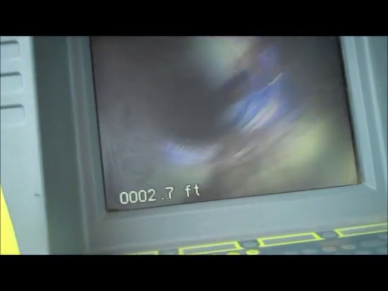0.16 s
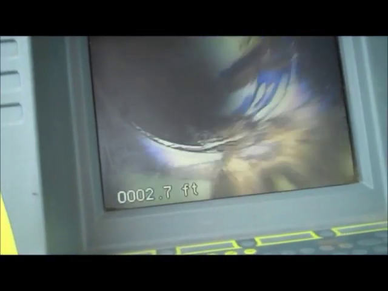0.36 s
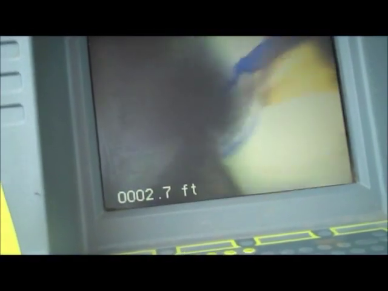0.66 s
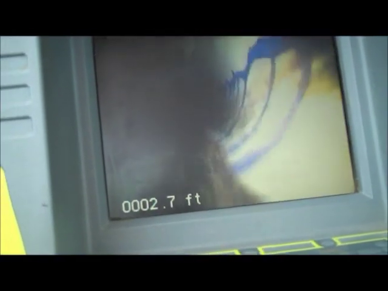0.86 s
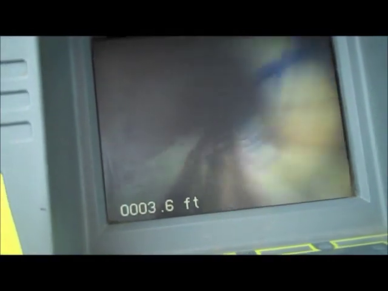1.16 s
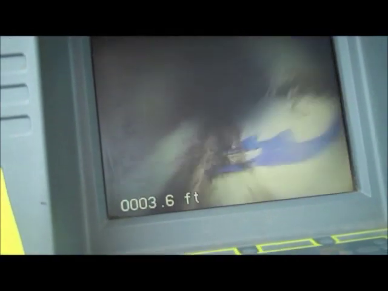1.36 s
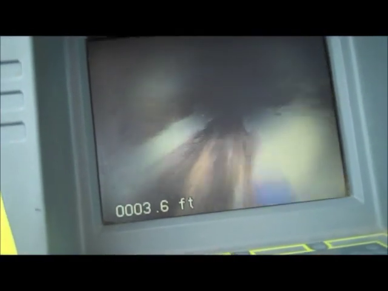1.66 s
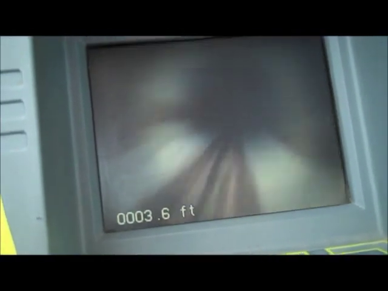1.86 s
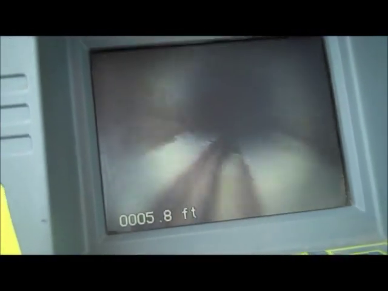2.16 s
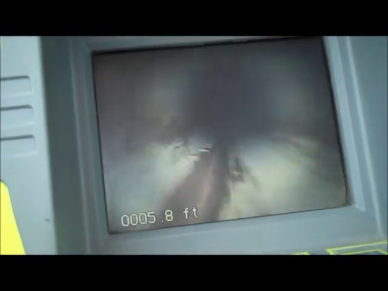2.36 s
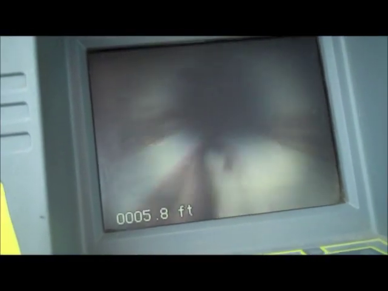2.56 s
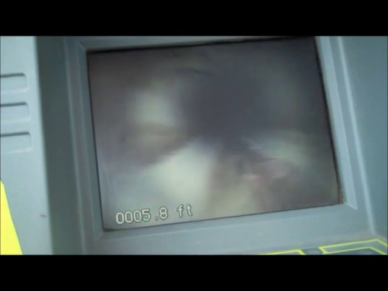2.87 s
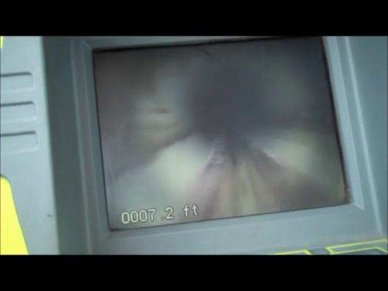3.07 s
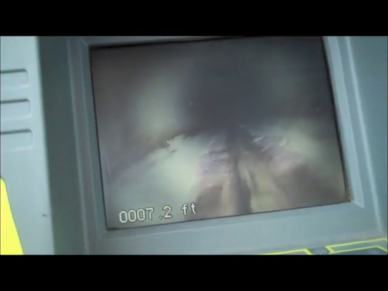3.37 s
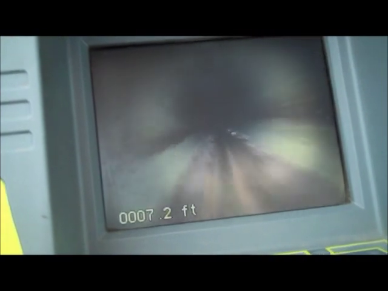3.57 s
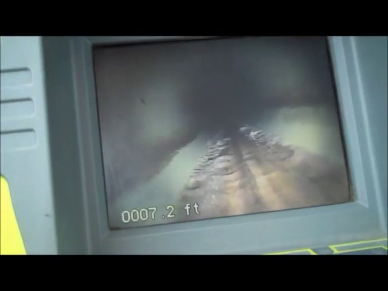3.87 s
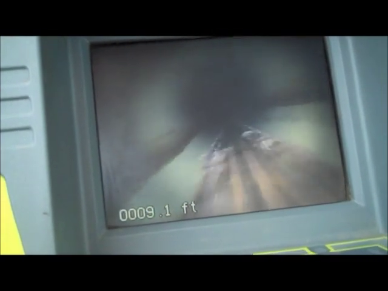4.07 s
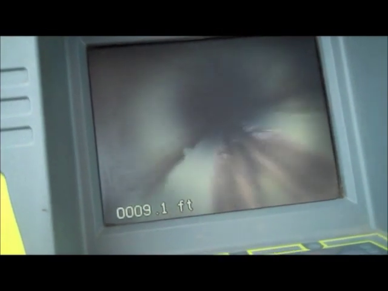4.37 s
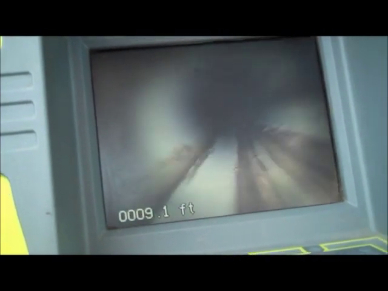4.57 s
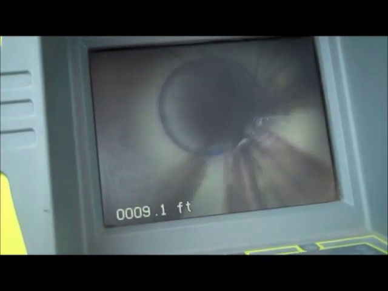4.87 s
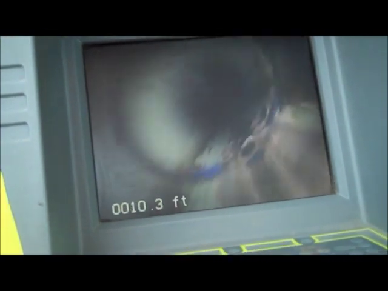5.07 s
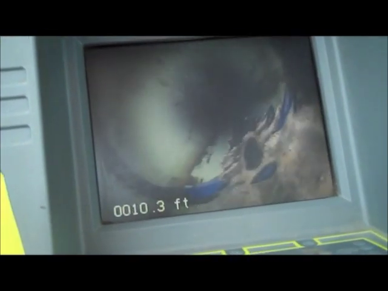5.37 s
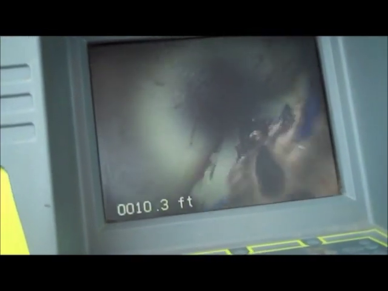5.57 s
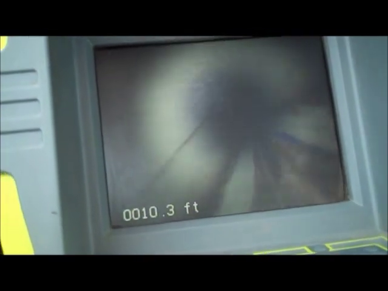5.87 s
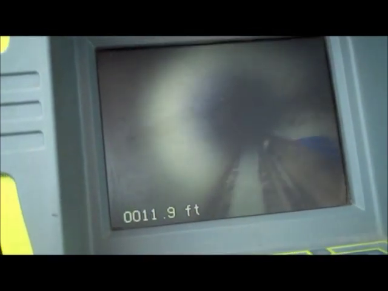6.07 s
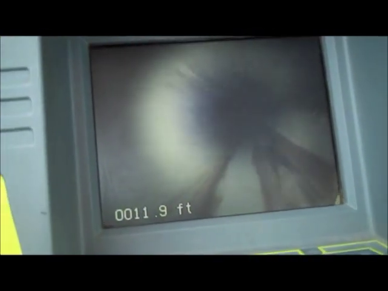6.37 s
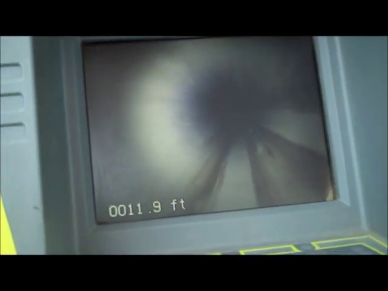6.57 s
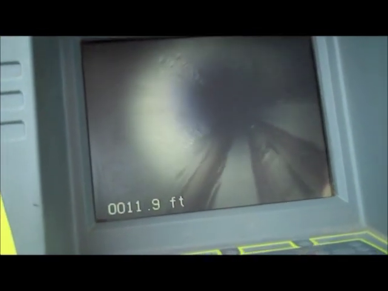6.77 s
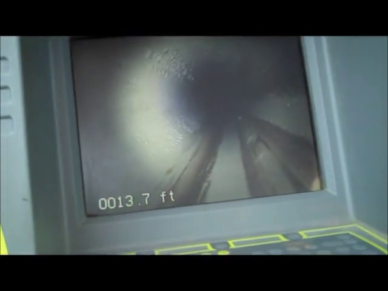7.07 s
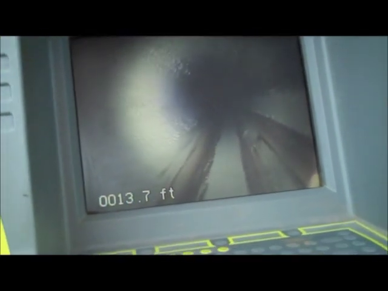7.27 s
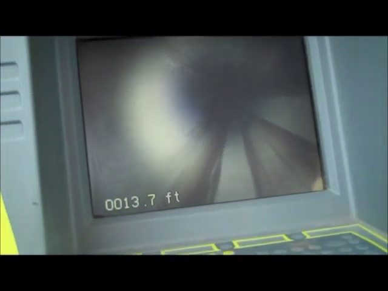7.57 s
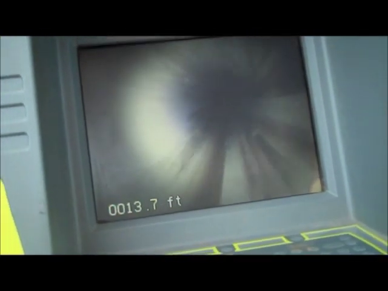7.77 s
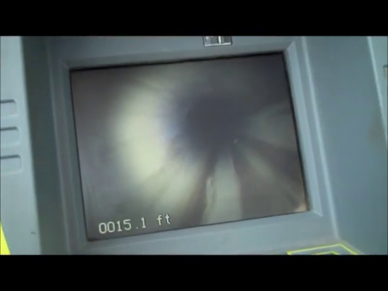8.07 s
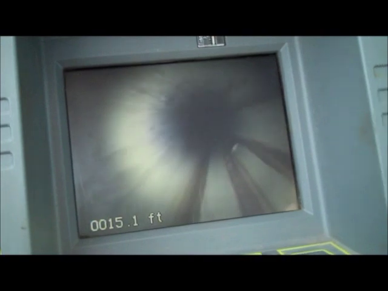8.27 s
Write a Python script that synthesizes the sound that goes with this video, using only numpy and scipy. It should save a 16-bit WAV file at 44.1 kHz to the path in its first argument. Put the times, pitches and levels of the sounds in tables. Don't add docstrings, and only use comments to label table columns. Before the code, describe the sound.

Outdoors by a wall, close bright stereo microphones, soft traffic rumble and hiss. At 0 s a dry snap and scuff, a slap at 0.15, then at 0.47 a huge overloading crack with a low bump on the left. Light gritty rubbing strokes and ticks follow to 2 s, with tiny squeaks around 1.4 and 1.7 and faint bird calls from 0.6 to 1.8. Knocks at 2.1 and 2.5; a rapid cluster of snaps with a hollow thud at 2.8-3.0. Short rasps, then a sharp slap at 4.0, distant birds to 4.5, a hard double slap at 4.7, another slap at 5.55. The busiest scraping and cracking is 6.2-6.5, with a pipe thud, then a dull knock and squeak at 6.8, a slap at 7.2, and sparse faint clicks and scuffs until 8.4. Throughout, the steel reel sings in thin wavering high tones, swelling with each pull.

```python
import sys
import numpy as np
from scipy import signal
from scipy.io import wavfile
from scipy.ndimage import uniform_filter1d

SR = 44100
rng = np.random.default_rng(int(sys.argv[2]) if len(sys.argv) > 2 else 0)


def output_pcm(signal):
    pcm = np.clip(np.atleast_2d(signal).T, -1, 1) * 32767
    wavfile.write(sys.argv[1], SR, np.round(pcm).astype(np.int16))


def invert_db(x):
    u = np.asarray(x, float) / 20
    return 10 ** u


N = 370881

# (frequency [Hz], density [dB per Hz])
OUTDOORS = [(30, -3), (150, -2), (300, -3.5), (480, -11), (1200, -7.5), (4000, -15.5), (8000, -25.5),
            (15000, -20.5)]
OUTDOORS_DB = -48.5
# (frequency [Hz], left-right likeness [0-1])
LIKENESS = [(60, 0.08), (180, 0.97), (540, 0.71), (1620, 0.53), (4870, 0.019), (14600, 0.048)]
# (frequency [Hz], width [Hz], level [dB])
HUM_LINES = [(67, 10.4, 2.5), (155.2, 6.4, -1), (232, 10, -6.5), (433.5, 37, -2.5)]
# (time [s], level [dB])
TRAFFIC = [(0, -56.5), (.5, -64), (1.8, -64), (2.2, -58), (3, -62.5), (5, -63), (6.4, -57), (7.8, -58),
           (8.41, -61)]

# (start [s], length [s], high frame [dB], middle frame [dB], low frame [dB])
SPINS = [(0, 0.17, -62, -55, -50.5), (.2, .26, -71, -61, -49.5), (.8, 0.33, -74, -70, -54),
         (1.462, 0.29, -60, -61, -52.5), (1.997, 0.26, -55, -62, -51.5), (2.306, 0.25, -55.5, -58, -56),
         (2.985, 0.36, -55.5, -58, -51.5), (3.427, 0.23, -54, -58, -46), (3.847, 0.24, -66, -60, -49.5),
         (4.45, .16, -58, -61, -55), (4.676, 0.1, -62, -65, -75), (4.914, .5, -60, -63, -58),
         (5.55, 0.56, -55, -66, -54), (6.0, 0.2, -65, -66, -58), (6.238, 0.11, -62, -64, -42.5),
         (6.45, 0.34, -73, -70, -56), (6.773, 0.29, -60, -65, -50), (7.25, 0.43, -65, -63, -57),
         (7.89, 0.24, -58, -63, -49.5), (8.243, 0.088, -56, -64, -55)]
SPIN_ATTACK_S, SPIN_SAG_DB_PER_S, SPIN_RELEASE_S = 0.02, -10, 0.05
# (frequency [Hz], width [Hz], level [dB])
HIGH_FRAME = [(7178, 26, -7), (7945, 30, -14)]
MID_FRAME = [(3970, 27, -8), (5150, 24, -13), (5820, 26, -14.5)]
LOW_FRAME = [(1916, 85, -5), (2347, 90, -15), (1588, 80, -13)]
IDLE_DB = -66.5
# (time [s], level [dB])
AXLE = [(0, -63), (2.5, -78), (2.9, -53), (3.3, -104), (5.5, -63), (5.8, -61), (6.2, -78), (7.6, -70),
        (7.9, -62), (8.41, -64)]
AXLE_HZ, AXLE_WIDTH_HZ = 3070, 22.0

# (time [s], crack peak [dB], pipe ring [dB], left-right [dB], extra sharpness [dB])
SLAPS = [(0.1436, -24.5, -32.5, 2, 0), (3.9886, -11, -28, 3, 0), (4.6992, -10, -21, 2.5, 7),
         (4.7018, -9.5, -22.5, -3, -11), (5.1305, -38, -35.5, -1, 0), (5.5474, -17, -24, -0.5, 0),
         (6.236, -20, -30.5, -5.5, 1), (6.434, -10, -34, 7.5, 2), (6.4365, -10.5, -27, 2, -4),
         (7.1693, -22, -29.5, -1, 0), (7.288, -37, -43, 2, 0)]
SNAPS = [(.0004, -20.5, -25.5, -1, 5), (0.4676, 10, -10, -3.5, 1), (1.094, -34.5, -49, 6, 5),
         (1.4082, -26, -43, 11.5, 2), (1.4244, -29, -60, 4, 4), (1.515, -22.5, -44, 10, 1.5),
         (2.7958, -17.5, -36, 3, -4), (2.8073, -9, -28.5, 0.5, -0.5), (2.888, -14, -32, -1, -2),
         (2.895, -20.5, -52, 14, 1), (2.9027, -14.5, -44, -9, -4), (2.9183, -13, -38, 0, -2),
         (2.942, -16.5, -36, 0, -1), (2.9628, -15.5, -29, -2, -2), (4.6116, -33.5, -49, 9, 6),
         (4.6544, -36, -36.5, 0, 0), (6.3934, -12, -37, 4, -0.5), (6.7316, -37, -57, 5, 3),
         (7.3597, -40, -55, 5, 3), (7.444, -28.5, -52, 7, -1), (8.166, -34.5, -44, 4, 6)]
SCUFFS = [(.012, -34, -33.5, 2, 0), (.459, -8, -22.5, 6, 0), (.766, -30, -43, 0, 0),
          (.972, -31, -42, -3, 0), (2.012, -29, -52, -1, 0), (2.158, -21, -33, 0.5, 0),
          (2.305, -34, -52, 3, 0), (2.436, -30, -39, 3, 0), (3.49, -29, -43, 3, 0),
          (4.912, -34.5, -49, 14, 0), (6.328, -16, -32.5, 1, 0), (6.357, -28, -43, -3, 0),
          (6.473, -13, -23.5, -0.5, 0), (8.266, -34, -48, 11, 0), (8.325, -38, -52, 6, 0)]
TAPS = [(1.3294, -37, -45, 3, 0), (3.1506, -36, -49, 2.5, 0), (3.966, -29, -33, 2.5, 3),
        (4.5344, -36, -30, 3, 0), (4.676, -20, -35, 2.5, 0)]
KNOCKS = [(1.596, -48, -34.5, 1.4, 0), (2.13, -25.5, -30, 0, 0), (2.4785, -32, -29, .5, 0),
          (2.531, -35, -27.5, 1, 0), (6.802, -36, -32, 2, 0)]
# (blows [table], attack [s], rattle t60 [s], sharp edge re crack [dB])
KINDS = [
    (SLAPS, 0.0018, 0.03, -26.5),
    (SNAPS, 0.0019, 0.031, -18),
    (SCUFFS, 0.007, 0.074, -18.5),
    (TAPS, 0.0015, 0.01, -20),
    (KNOCKS, 0.0029, 0.042, -16),
]
FIRST_CONTACT = 5
ROD_SPREAD = .8
# (frequency [Hz], level [dB], t60 [s])
PIPE_WALL = [(1506, 6, 0.059), (1750, 14, 0.0096), (2010, -14.5, 0.0095), (2170, 8, 0.0038),
             (2600, 7, 0.037), (2600, 11, 0.0096), (3010, -3, 0.043), (3420, 3, 0.0059)]

# (time [s], pitch [Hz], level [dB])
TICKS = [(.012, 2900, -31), (.016, 1750, -32), (.416, 1450, -34), (.436, 1400, -35), (1.166, 2550, -36),
         (1.19, 2050, -32.5), (1.207, 2500, -38), (1.229, 2500, -36), (1.252, 2700, -41),
         (1.268, 3350, -38), (1.29, 2370, -31.5), (1.308, 1300, -38), (1.322, 3500, -42),
         (1.334, 1540, -34), (1.362, 2200, -39), (1.403, 3350, -39.5), (1.493, 1880, -37),
         (1.598, 1750, -28.5), (1.597, 2600, -33), (1.684, 3310, -38), (1.955, 3310, -41),
         (2.131, 1760, -28.5), (2.136, 2700, -32), (2.161, 2100, -34), (2.22, 2900, -38),
         (2.311, 2450, -37), (2.432, 2350, -34), (2.48, 1800, -31), (2.918, 2400, -33), (2.963, 1820, -31),
         (6.33, 2300, -35), (6.479, 1710, -33), (2.532, 2340, -22.5), (3.517, 1950, -37),
         (3.951, 1430, -34), (3.99, 2470, -26), (3.99, 3300, -35), (4.376, 1900, -37), (4.534, 2720, -40),
         (4.655, 2600, -33), (4.701, 3270, -18), (5.205, 1930, -39), (5.69, 1400, -39), (5.71, 2400, -39),
         (5.78, 2700, -41), (5.93, 2500, -38), (6.05, 2600, -37), (6.263, 1920, -35), (6.306, 1850, -30),
         (6.394, 3740, -32), (6.437, 2710, -27), (6.437, 3270, -31), (6.777, 1980, -37), (6.803, 2520, -25),
         (6.806, 1890, -28), (6.98, 1870, -40), (7.171, 2390, -33), (7.385, 1450, -37), (8.289, 1920, -39)]

# (start [s], length [s], bright rub [dB], pipe body [dB])
STROKES = [(.13, 0.092, -45.5, -52), (.36, 0.17, -48, -44.5), (.74, 0.39, -46.5, -51),
           (1.14, .22, -48.5, -46), (1.4, 0.47, -45.5, -48.5), (1.86, 0.13, -43.5, -46.5),
           (2.0, 0.21, -46.5, -50), (2.13, 0.22, -36, -41.5), (2.42, 0.12, -41, -42.5),
           (2.62, 0.5, -51, -52), (2.865, 0.16, -35.5, -38), (3.13, 0.084, -40.5, -44),
           (3.29, 0.068, -43, -48), (3.47, 0.066, -35.5, -41.5), (3.57, 0.13, -46.5, -46),
           (3.77, 0.25, -39.5, -48), (4.0, 0.23, -45.5, -48), (4.25, 0.34, -47, -51),
           (4.6, 0.14, -41, -43.5), (4.91, 0.57, -46, -49), (5.33, 0.11, -42.5, -53),
           (5.57, 0.28, -43.5, -45), (5.88, 0.48, -54.5, -47), (6.2, 0.1, -40.5, -41.5),
           (6.3, 0.19, -32, -37.5), (6.52, 0.37, -46.5, -46.5), (6.82, 0.23, -40.5, -46.5),
           (7.15, 0.31, -49.5, -48.5), (7.9, 0.13, -50, -48.5), (8.25, 0.084, -48, -51.5)]
STROKE_ATTACK_S, STROKE_SAG_DB_PER_S, STROKE_RELEASE_S = 0.022, 5, 0.038

# (time [s], peak [dB])
THUDS = [(0.143, -45), (2.129, -44), (2.532, -42.5), (2.804, -42), (2.941, -47), (2.961, -30), (3.491, -45),
         (4.534, -44), (4.7, -36.5), (5.548, -44), (6.311, -42), (6.433, -44), (6.479, -29.5), (6.801, -42),
         (7.17, -41.5)]
BOUNCE_S, BOUNCE_DB = 0.00553, 1
# (frequency [Hz], level [dB], t60 [s])
PIPE_AIR = [(135, 1, 0.033), (256, 2, 0.024), (385, 8, 0.04), (509, 5, 0.053), (870, -4, 0.04),
            (1244, 2, .025)]

# (time [s], level [dB], left-right [dB])
LOW_BUMP = (.468, -22, 18.5)

# (time [s], length [s], final pitch [Hz], level [dB], left-right [dB])
WHIT = [(.645, .095, 4900, -53.5, 4), (.855, .09, 4960, -54, 2), (1.062, .09, 5080, -54.5, 7),
        (3.87, .08, 5070, -57, 5), (4.078, .085, 5000, -56.5, 3), (4.285, .095, 5260, -56, -1)]
PIP = [(.785, 0.02, 4360, -54, 7), (.99, 0.03, 4360, -51, 10)]
TSEE = [(1.208, 0.11, 6180, -44.5, 0), (4.425, 0.11, 6140, -48, 0)]
TSIP = [(1.512, .08, 5880, -47.5, 0), (1.787, .058, 5870, -46, 0)]
LIFT = [(4.21, .06, 4700, -53, 2)]
SQUEAKS = [(1.385, 0.027, 1082, -45.5, 1), (1.676, .028, 1325, -48, 1), (1.712, .04, 1240, -49, 1),
           (3.155, .022, 1030, -45, 1), (6.8, 0.045, 944, -47, 1)]
# (share of note [0-1], pitch over final pitch [ratio], level [dB])
RISING = [(0, .62, -7), (.2, .67, 1), (.3, .7, -5), (.4, .79, -15), (.52, .9, 0), (.66, .94, -3),
          (1, 1.001, -10)]
LEVEL = [(0, .97, -3), (.3, .995, 0), (1, 1.001, -3)]
FALLING = [(0, 1.2, -5), (.12, 1.1, -3), (.27, 1.01, 0), (.45, .985, -2), (.7, 1.01, -1), (1, 1.02, -9)]
DROPPING = [(0, 1.17, -7), (.2, 1.08, -4), (.45, 1.005, 0), (1, .995, -7)]
LIFTING = [(0, .84, -1), (.4, .87, -2), (.7, .93, -8), (1, 1.001, -2)]
SAGGING = [(0, 1.14, -4), (.5, 1.08, 0), (1, 1.001, -3)]

YARD_T60_S, YARD_DB = 0.12, -7
TREES_T60_S, TREES_DB = .2, -3.5
# (resonance [Hz], Q [ratio], case shading from [Hz])
PORTS = [(7405, 5.9, 23200), (6000, 5.95, 5330)]
CUTOFF_HZ = 14200


def rms_one(x):
    return x / np.sqrt(np.mean(x ** 2) + 1e-20)


def at_hz(points, hz):
    points_hz, values = np.transpose(points)
    return np.interp(np.log(hz), np.log(points_hz), values)


def in_time(rows):
    s, *columns = np.transpose(rows)
    return [np.interp(np.arange(N) / SR, s, c) for c in columns]


def band(x, low_hz, high_hz):
    return signal.sosfilt(signal.butter(2, [low_hz, high_hz], "band", fs=SR, output="sos"), x)


def drift(rate):
    r = np.exp(-80 * np.pi * rate / SR)
    slow = signal.lfilter([1], [1, -2 * r, r * r], rng.standard_normal(N // 40 + 2002))[2000:]
    return np.interp(np.arange(N) / 40, np.arange(len(slow)), rms_one(slow))


def ring(clicks, hz, t60):
    r, w = invert_db(-60 / (t60 * SR)), 2 * np.pi * hz / SR
    return signal.lfilter([0, np.sin(w)], [1, -2 * r * np.cos(w), r * r], clicks + 1e-18)


def whistle(hz, width_hz):
    t60_s = np.log(1000) / (np.pi * width_hz)
    return rms_one(ring(rng.standard_normal(N), hz, t60_s))


def grains(per_s, spread_db):
    sizes = invert_db(spread_db * np.minimum(rng.exponential(1, N), 4))
    signs = rng.choice([-1, 1], N)
    return rms_one(sizes * signs * (rng.random(N) < per_s / SR))


def clicks(times_s, heights):
    out = np.zeros(np.shape(heights)[:-1] + (N,))
    out[..., (np.asarray(times_s) * SR).astype(int)] = heights
    return out


def sides(pan_db):
    return invert_db(np.outer([.5, -.5], pan_db))


def wide(x):
    one_sided = np.roll(x, N // 2) * [[1], [-1]]
    return (x + ROD_SPREAD * one_sided) / np.hypot(1, ROD_SPREAD)


def spells(rows, attack_s, sag_db_per_s, release_s):
    t, power = np.arange(0, N, 32) / SR, 0
    for s, length_s, *levels_db in rows:
        age = t - s
        rise = np.clip(age / attack_s, 0, 1)
        sag = invert_db(-sag_db_per_s * (age - .5 * length_s))
        release = np.exp(-np.maximum(age - length_s, 0) / release_s)
        power = power + np.outer(invert_db(np.array(levels_db)), rise * sag * release) ** 2
    return [np.interp(np.arange(N) / SR, t, np.sqrt(p)) for p in power]


def pipe_wall(contacts, longest_s):
    out = 0
    for k, (hz, db, t60) in enumerate(PIPE_WALL):
        out = out + invert_db(db) * ring(contacts, hz, min(.5 * t60, longest_s)) * (-1) ** k
    return out


def outdoors():
    floor, edges_hz = 0, 22 * 2 ** np.arange(0, 9.6, .5)
    white = rng.standard_normal((2, 2, N))
    for k, (low, high) in enumerate(zip(edges_hz, edges_hz[1:])):
        mid, side = band(white[k % 2], low, high)
        center_hz = np.sqrt(low * high)
        alike = np.clip(at_hz(LIKENESS, center_hz), -1, 1)
        gain = invert_db(at_hz(OUTDOORS, center_hz) + 1.57 * drift(2.9))
        stereo = np.sqrt(1 + alike) * mid + np.sqrt(1 - alike) * side * [[1], [-1]]
        floor = floor + gain * stereo
    traffic_db, hum = in_time(TRAFFIC)[0], 0
    for hz, width_hz, db in HUM_LINES:
        hum = hum + invert_db(traffic_db + db + drift(14.0)) * whistle(hz, width_hz)
    return invert_db(OUTDOORS_DB) * rms_one(floor) + hum


def reel():
    out = invert_db(in_time(AXLE)[0]) * whistle(AXLE_HZ, AXLE_WIDTH_HZ)
    gains = spells(SPINS, SPIN_ATTACK_S, SPIN_SAG_DB_PER_S, SPIN_RELEASE_S)
    for gain, frame in zip(gains, (HIGH_FRAME, MID_FRAME, LOW_FRAME)):
        singing = np.hypot(gain, invert_db(IDLE_DB))
        for hz, width_hz, db in frame:
            out = out + singing * invert_db(db + 2.2 * drift(12)) * whistle(hz, width_hz)
    return out


def slaps():
    t = np.arange(int(.2 * SR)) / SR
    rattle = grains(per_s=5000, spread_db=2.5)
    rattle = rattle + clicks([row[0] + .0011 for row in [*SLAPS, *SNAPS]], FIRST_CONTACT)
    envelopes = np.zeros((3, 2, N + len(t)))
    for rows, attack_s, t60, edge_db in KINDS:
        attack = np.minimum(t / attack_s, 1)
        for s, crack_db, ring_db, pan_db, sharp_db in rows:
            start = int(s * SR)
            # (level [dB], share of the rattle t60)
            parts = [(crack_db - 14.5, 1.01), (ring_db + 3, .9), (crack_db + edge_db + sharp_db + 4.5, .95)]
            for k, (level_db, share) in enumerate(parts):
                dying = invert_db(level_db - 60 * t / (share * max(t60, .008))) * attack
                dying = dying * (1 + 0.71 * np.exp(-t / 0.0013))
                envelopes[k, :, start:start + len(t)] += sides([pan_db]) * dying
    crack, knock, edge = envelopes[..., :N]
    blows = knock * rattle
    body = band(invert_db(-31) * pipe_wall(blows, longest_s=.009) + invert_db(6.0) * blows, 720, 3440)
    middle = invert_db(-3.0) * np.sqrt(crack * knock) * wide(rms_one(band(rattle, 2700, 5000)))
    bright = crack * wide(rms_one(band(rattle, 4130, 8220)))
    top = rms_one(band(band(rattle, 8500, 14500), 6000, 12000))
    return middle + bright + edge * wide(top) * sides([-3.0]) + body


def ticks():
    out, t = np.zeros(N), np.arange(int(.03 * SR)) / SR
    swell = t / 0.002 * np.exp(1 - t / 0.0018)
    for s, hz, db in TICKS:
        start = int(s * SR)
        out[start:start + len(t)] += invert_db(db - 3.5) * swell * np.sin(2 * np.pi * hz * t)
    return out


def rubbing():
    bright, dull = spells(STROKES, STROKE_ATTACK_S, STROKE_SAG_DB_PER_S, STROKE_RELEASE_S)
    sand = grains(per_s=9000, spread_db=2.5)
    grit = grains(per_s=3000, spread_db=3.2)
    top = rms_one(band(sand, 8500, 14000))
    rasp = rms_one(band(sand, 5760, 10330)) + invert_db(2.0) * top
    wall = rms_one(pipe_wall(grit, longest_s=.01))
    body = .3 * wall + .9 * rms_one(band(grit, 700, 3600))
    uneven = invert_db(2.2 * drift(18))
    return uneven * (invert_db(-14.5) * bright * wide(rasp) + invert_db(-3.5 + 2.0 * drift(34)) * dull * body)


def struck(times_s, heights, modes, spread_db):
    luck, out = rng.standard_normal((len(times_s), len(modes), 2)), 0
    for k, (hz, level_db, t60) in enumerate(modes):
        strengths = heights * invert_db(level_db + spread_db * luck[:, k, 0]) * np.sign(luck[:, k, 1])
        out = out + ring(clicks(times_s, strengths), hz, t60)
    return out


def thuds():
    s, peak_db = np.transpose(THUDS)
    times_s = np.r_[s, s + BOUNCE_S]
    heights = invert_db(np.r_[peak_db, peak_db + BOUNCE_DB] - 10)
    return band(struck(times_s, heights, PIPE_AIR, spread_db=3.5), 80, 1500)


def low_bump():
    s, db, pan_db = LOW_BUMP
    return band(clicks([s], sides([pan_db]) * invert_db(db + 40.0)), 25, 270)


def chirps(notes, shape):
    out, waver = np.zeros((2, N)), 1 + .009 * drift(200)
    points, ratio, swell_db = np.transpose(shape)
    for s, length_s, hz, db, pan_db in notes:
        share = np.linspace(0, 1, int(length_s * SR))
        at = slice(int(s * SR), int(s * SR) + len(share))
        glide = uniform_filter1d(np.interp(share, points, ratio), size=200)
        phase = 2 * np.pi * np.cumsum(hz * waver[at] * glide) / SR
        height = invert_db(db + np.interp(share, points, swell_db)) * np.sin(np.pi * share) ** 0.066
        out[:, at] += sides([pan_db]) * height * np.sin(phase)
    return out * invert_db(2.0 * drift(60))


def birds():
    calls = chirps(WHIT, RISING) + chirps(PIP, LEVEL) + chirps(LIFT, LIFTING)
    return calls + chirps(TSEE, FALLING) + chirps(TSIP, DROPPING)


def squeaks():
    return chirps(SQUEAKS, SAGGING)


def yard(x, t60):
    t = np.arange(int(.25 * SR)) / SR
    scatter = band(rng.standard_normal((2, len(t))), 700, 9000)
    echoes = scatter * invert_db(-60 * t / t60) * np.minimum(t / 0.0016, 1)
    echoes = echoes / np.sqrt(np.sum(echoes ** 2, axis=1, keepdims=True))
    return signal.oaconvolve(x, echoes, axes=1)[:, :N]


def scene():
    near = slaps() + ticks() + rubbing() + thuds() + squeaks()
    calls = birds()
    far_birds = calls + invert_db(TREES_DB) * yard(calls, TREES_T60_S)
    return outdoors() + reel() + near + invert_db(YARD_DB) * yard(near, YARD_T60_S) + far_birds


def port(x, hz, q, shade_hz):
    b, a = signal.bilinear([1], [1, 1 / q, 1], fs=.5 / np.tan(np.pi * hz / SR))
    shaded = signal.lfilter(*signal.butter(1, min(shade_hz, 20000), fs=SR), x)
    return signal.lfilter([np.sum(a)], a, shaded)


def band_limit(x):
    return signal.sosfilt(signal.butter(12, 15210, fs=SR, output="sos"), x)


def record(dry):
    out = np.array([port(x, *settings) for x, settings in zip(dry, PORTS)])
    hiss = invert_db(-59.5) * rng.standard_normal((2, N))
    top_cut = signal.ellip(12, .5, 70, CUTOFF_HZ, fs=SR, output="sos")
    out = signal.sosfilt(top_cut, out + low_bump() + hiss)
    return band_limit(np.clip(out, -1, 1))


dry = scene()
out = record(dry)
output_pcm(out)
```